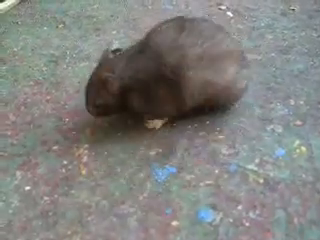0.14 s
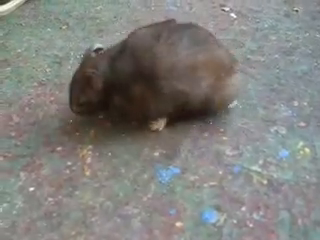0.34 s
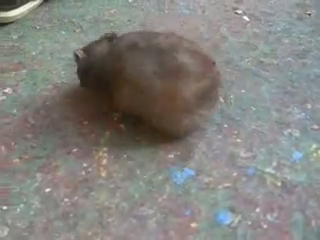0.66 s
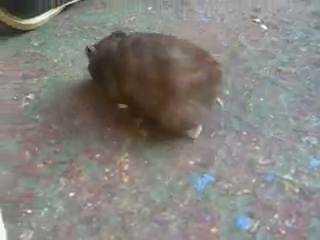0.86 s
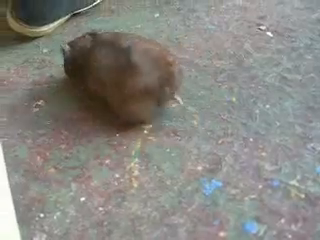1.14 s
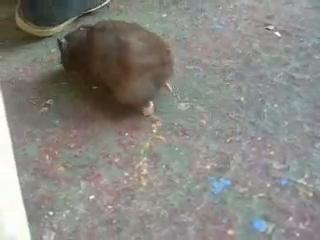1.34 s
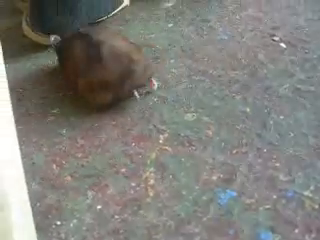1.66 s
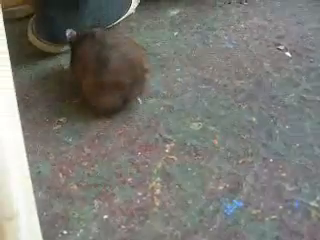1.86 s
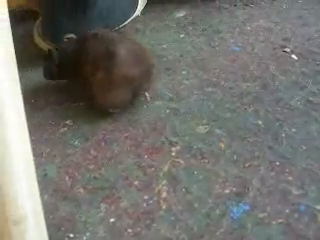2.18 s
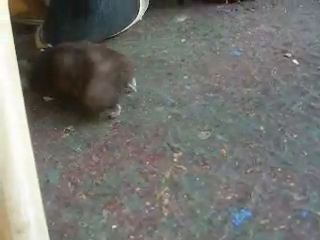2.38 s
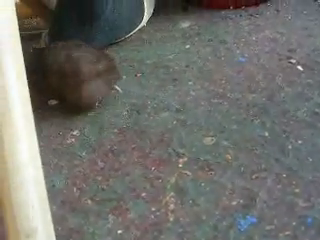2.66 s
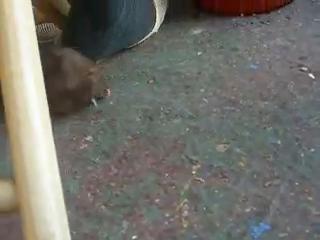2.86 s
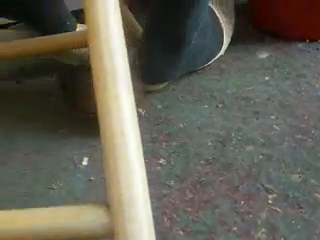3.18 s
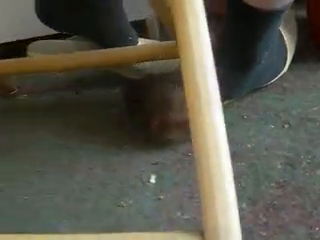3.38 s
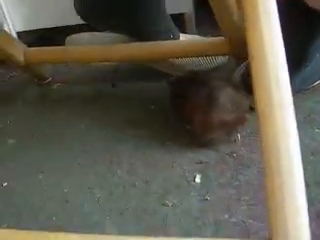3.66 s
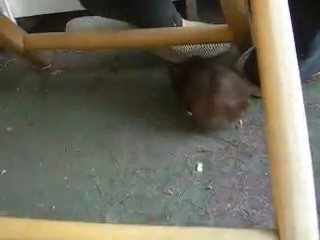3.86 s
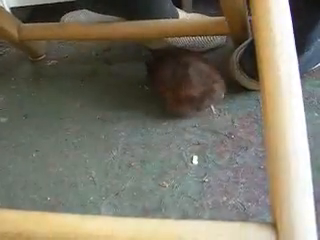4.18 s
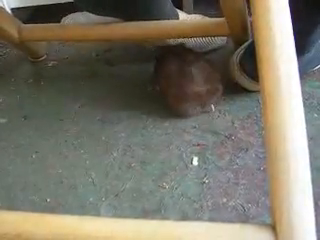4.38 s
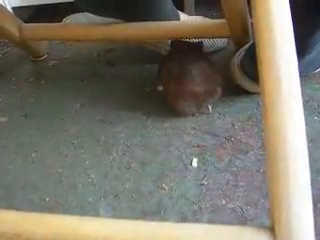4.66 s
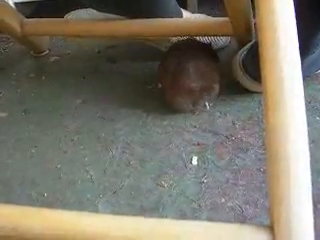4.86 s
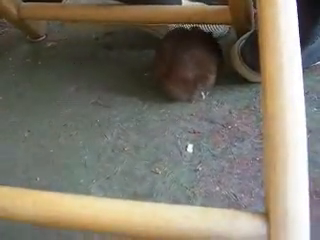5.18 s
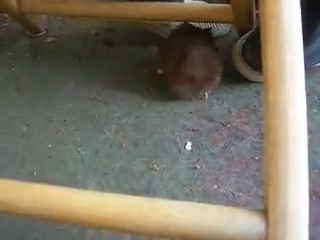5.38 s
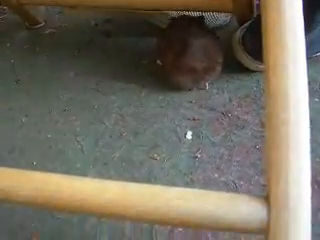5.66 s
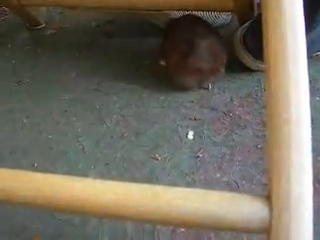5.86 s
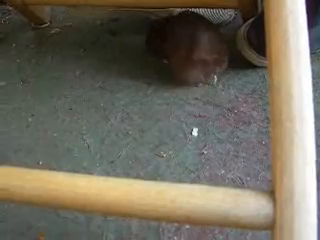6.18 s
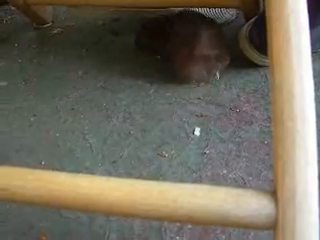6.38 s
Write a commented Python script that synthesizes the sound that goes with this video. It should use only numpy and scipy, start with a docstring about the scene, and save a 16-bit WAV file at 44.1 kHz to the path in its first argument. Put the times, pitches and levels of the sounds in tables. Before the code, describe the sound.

Over a steady low rush and wavering far motor hum, a small rodent calls in shrill, hoarse-edged chirping squeaks, at first about a second apart, then closer together and mostly weaker. Dull bumps and crisp clicks on the floor fall between them, and a faint drone appears late. The indoor space is reverberant; the small camera microphone sounds lo-fi, with harsh mirrored highs.

```python
"""From the start a low rush, shaped noise, and a far motor's hum, two wavering sines, lie under the scene.
A small rodent gives nine shrill squeaks: near-sine whistles that slide up and turn raspy, ringing in a room.
Among them come dull knocks and then sharp floor ticks, damped noise bursts; late on a faint sine drones.
Throughout, a pocket camera samples slowly and holds each sample, mirroring the squeaks into the treble."""
import sys
import numpy as np
from scipy import signal
from scipy.fft import rfft, irfft
from scipy.io import wavfile
from scipy.ndimage import map_coordinates

SR = 44100
rng = np.random.default_rng(int(sys.argv[2]) if len(sys.argv) > 2 else 0)


def wav_out(sig):
    """Save sig, one row per channel (or a flat mono array), as 16-bit PCM at SR to the path in sys.argv[1]."""
    wavfile.write(sys.argv[1], SR, np.round(np.clip(np.atleast_2d(sig).T, -1, 1) * 32767).astype(np.int16))


N = 287532
TIME = np.arange(N) / SR  # s

# Levels in the tables are relative: source, room and camera gains follow.
# Squeaks, one row a note; the sixth starts with a faint extra note and the ninth has two:
# (start [s], lead-in [s], length [s], opening pitch [Hz], top pitch [Hz], closing pitch [Hz],
#  lead-in level [dB], level [dB], fade [dB], opening roughness [0-1], late roughness [0-1])
SQUEAK_NOTES = [ (0.206, .030, 0.085, 2991, 3498, 3040, -22, -8.5, 11, .16, 0.59),
                (1.341, 0.039, 0.084, 3230, 3477, 2812, -24.5, -12, 3, 0.5, 0.61),
                (2.237, 0.039, 0.068, 3130, 3594, 3038, -20, -11.5, 4.5, 0.3, 0.53),
                (3.067, 0.029, 0.098, 3022, 3471, 2958, -24, -13.5, 2, 0.42, 0.51),
                (4.249, .036, 0.092, 3290, 3360, 2755, -24.5, -14, 4.5, 0.48, 0.48),
                (4.81, 0.019, 0.043, 3110, 3090, 3050, -41, -34, 3, .68, 1),
                (4.896, .054, 0.018, 2878, 2896, 2884, -23.5, -5.5, 4.5, 0.15, 0.22),
                (5.081, .072, .066, 2897, 3180, 3030, -20, -13.5, 10.5, 0.35, 0.31),
                (5.593, .088, 0.057, 2885, 2900, 2830, -31, -24, 8.5, 0.6, 0.49),
                (6.075, 0.049, 0.0066, 2960, 2940, 2900, -40, -21, 4.5, 0.21, 0.37),
                (6.119, 0.03, 0.091, 2700, 2554, 2676, -33, -25.5, 11, .6, 0.41)]
# A second, lower whistle around the eighth squeak: (time [s], pitch [Hz], level [dB], roughness [0-1])
LOWER_WHISTLE = [(5.605, 1684, -30, 0.36), (5.625, 1760, -37, .2), (5.635, 2190, -28.5, 0.2),
                 (5.68, 2060, -51, 0.05)]
# Brief pressure changes, nearly all pushes that make the voice louder: (time [s], boost [dB])
PRESSURE_PUSHES = [(2.237, 5), (2.255, -0.5), (4.27, 6.5), (4.850, 4), (5.044, 4), (5.536, 6)]
# Sharp ticks on the floor: (time [s], level [dB], centre [Hz])
FLOOR_TICKS = [(1.5244, -19.5, 2600), (1.7858, -36.5, 2900), (2.5284, -31.5, 3620), (2.5544, -36, 2680),
               (3.4161, -17, 2900), (3.4338, -25.5, 2730), (3.4986, -22, 2250), (3.6132, -23.5, 2860),
               (3.6706, -37.5, 1630)]
# Dull knocks, the loudest with a rebound: (time [s], level [dB], centre [Hz])
DULL_KNOCKS = [(.424, -20, 750), (2.9535, -13.5, 680), (2.976, -26, 1100)]
# Spectrum of the low rush of the surroundings: (frequency [Hz], relative density [dB])
RUSH_SPECTRUM = [(15, -52), (25, -20), (32, -27.5), (101, -7.5), (127, -10), (160, -3.5), (190, -4.5),
                 (245, -4), (266, -6), (351, -4.5), (524, -8.5), (1170, -13), (3900, -29), (5070, -13),
                 (8580, -120)]
# Course of the rush: (time [s], level [dB], level of the band near 700 Hz re the rush [dB])
RUSH_COURSE = [(0, -31.5, -3), (.6, -31.5, -4), (1.2, -32, -6), (1.9, -31.5, -12), (3.2, -30.5, -32.5),
               (4.5, -33, -16.5), (5.501, -34, -7.5), (6.52, -33.5, -10.5)]
# Partials of the motor hum: (frequency [Hz], relative level [dB])
HUM_PARTIALS = [(161.5, -40.5), (242.2, -42)]
# Course of the motor hum: (time [s], level [dB])
HUM_COURSE = [(0, -39), (.6, -34), (1.9, -31.5), (2.3, -39.5), (3.6, -32), (4.2, -35), (4.5, -43),
              (5.3, -36), (6.52, -38)]
# The faint far drone: (time [s], pitch [Hz], level [dB])
DRONE_COURSE = [(4.3, 406, -64), (4.7, 414.6, -37), (5.4, 436.3, -37), (5.9, 411, -42), (6.25, 437, -34.5),
                (6.52, 426.5, -39.5)]

LEAD_HZ, LEAD_SWELL_DB, LEAD_ROUGH = 2542, 8, 0.619  # every lead-in starts low and hoarse, and swells
LEAD_FADE_S = 0.0039  # time constant with which the voice creeps in
BREAK_AT, TOP_AT, DROP_AT = 0.29, 0.44, 0.81  # shares of the length: voice breaks, reaches top, starts to drop
ATTACK_S, RELEASE_S, RELEASE_DB = 0.0134, 0.0082, 15.5
THROB_DB, THROB_HZ = 1.72, 72.4  # uneven pressure within a squeak: rms depth and rate
PUSH_S = 0.0056  # time from the centre of a push to 1/e of its boost
LURCH_HZ, LURCH_RATE_HZ = 150, 91  # a fully rough voice also lurches in pitch: rms depth and rate
HOLD_HZ, TOP_HZ = 7884, 12500  # the camera's sample rate and upper band limit


def undb(db):
    """An amplitude ratio is ten to the power of its decibels over twenty."""
    return 10 ** (np.asarray(db) / 20)


def unit(x):
    """Division by the root mean square gives a signal of rms 1."""
    return x / np.sqrt(np.mean(x ** 2))


def shaped(gain, size=N):
    """White noise filtered in the frequency domain takes the spectrum gain(f), here at rms 1."""
    f = np.fft.rfftfreq(size, 1 / SR) + 1e-3  # keeps clear of 0 Hz
    spectrum = rfft(rng.standard_normal(size)) * gain(f)
    return unit(irfft(spectrum, size))


def wander(rate_hz):
    """Low-passed noise is a random motion up to about the given rate."""
    return shaped(lambda f: 1 / (1 + (f / rate_hz) ** 4))


def band(hz, width_hz, size=N):
    """A resonance passes noise near its centre and rejects it by detuning over bandwidth."""
    return shaped(lambda f: 1 / (1 + ((f * f - hz * hz) / (f * width_hz)) ** 2), size)


def rodent(jitter_hz=260, jitter_rate_hz=600, flutter_depth=1.72, flutter_rate_hz=330, rasp_db=-6):
    """A tiny voice goes between clean and harsh as its oscillation loses regularity; pressure sets its level."""
    jitter = jitter_hz * wander(jitter_rate_hz) + LURCH_HZ * wander(LURCH_RATE_HZ)
    flutter = flutter_depth * (wander(flutter_rate_hz) + 1j * wander(flutter_rate_hz))
    rasp = undb(rasp_db) * band(hz=2890, width_hz=5600)
    pressure_db = THROB_DB * wander(THROB_HZ)
    for s, boost_db in PRESSURE_PUSHES:
        pressure_db += boost_db * np.exp(-((TIME - s) / PUSH_S) ** 2)
    paths = [squeak(*note) for note in SQUEAK_NOTES] + [LOWER_WHISTLE]
    voice = sum(whistle(path, jitter, flutter, rasp) for path in paths)
    return undb(pressure_db) * voice


def squeak(start, lead_s, length, hz, top_hz, end_hz, lead_db, db, fade_db, rough, late_rough):
    """A note is a path of pitch, level and roughness: a hoarse upward slide, a break toward the top, a fade."""
    t = np.linspace(-lead_s, length + RELEASE_S, 200)  # 0 is the end of the lead-in
    broken, top, drop = length * np.array([BREAK_AT, TOP_AT, DROP_AT])
    pitch = np.interp(t, [-lead_s, 0, broken, top, drop, length],
                      [LEAD_HZ, hz, hz, top_hz, top_hz, end_hz])
    faded_db = db - fade_db
    level = np.interp(t, [-lead_s, -ATTACK_S, 0, length, length + RELEASE_S],
                      [lead_db - LEAD_SWELL_DB, lead_db, db, faded_db, faded_db - RELEASE_DB])
    level -= RELEASE_DB * np.exp(-(t + lead_s) / LEAD_FADE_S)
    roughness = np.interp(t, [-ATTACK_S, 0, broken, top], [LEAD_ROUGH, rough, rough, late_rough])
    return np.column_stack([start + t, pitch, level, roughness])


def whistle(path, jitter, flutter, rasp):
    """Random modulation of a near-sine's phase and amplitude smears its line into a band; noise adds rasp."""
    s, *columns = np.transpose(path)
    on = (TIME >= s.min()) & (TIME <= s.max())
    hz, db, rough = (np.interp(TIME[on], s, column) for column in columns)
    cycle = np.exp(2j * np.pi * np.cumsum(hz + rough * jitter[on]) / SR)
    strength = np.sqrt(2 * (1 - rough ** 2)) + rough * flutter[on]
    out = np.zeros(N)
    out[on] = undb(db) * (np.real(cycle * strength) + rough * rasp[on])
    return out


def taps(rows, width_hz, t60, gain_db, rise_s):
    """A contact excites one broad, heavily damped resonance, which decays exponentially."""
    out = np.zeros(N)
    t = TIME[:SR // 10]
    decay = np.exp(-np.log(1000) * t / t60)  # 60 dB down after t60 seconds
    envelope = (1 - np.exp(-t / rise_s)) * decay
    for s, db, hz in rows:
        i = int(s * SR)
        out[i:i + len(t)] += undb(db + gain_db) * band(hz, width_hz, size=len(t)) * envelope
    return out


def room(x, t60, wet_db, direct_db, early=1.0, early_s=0.066):
    """Reverberation is convolution with echoes that grow denser and decay, strongest early, after the direct sound."""
    t = TIME[:SR * 3 // 4]
    density = np.clip(0.03 + (t / 0.097) ** 2, 0, 1)  # chance of an echo in each sample
    present = rng.standard_normal(len(t)) * (rng.random(len(t)) < density)
    echoes = present / np.sqrt(density)
    echoes *= np.exp(-np.log(1000) * t / t60)
    echoes *= 1 + early * np.exp(-t / early_s)  # reflections from floor and furniture
    echoes *= t > 0.002
    echoes /= np.sqrt(np.sum(echoes ** 2))
    reverberant = signal.fftconvolve(x, echoes)[:N]
    return undb(direct_db) * x + undb(wet_db) * reverberant


def motor_hum(gain_db=-3, waver_db=3.5, drift=0.00767):
    """Two partials of one far motor share its drifting speed, while the level of each wavers on its own."""
    turns = np.cumsum(1 + drift * wander(rate_hz=4.2)) / SR
    hum = np.zeros(N)
    for hz, db in HUM_PARTIALS:
        hum += undb(db + waver_db * wander(rate_hz=1.6)) * np.sin(2 * np.pi * hz * turns)
    level_db = np.interp(TIME, *np.transpose(HUM_COURSE))
    return unit(hum) * undb(gain_db + level_db)


def far_drone(drift=0.02975, waver_db=2.8):
    """A sine whose phase integrates an unsteady pitch is heard as a faint drone."""
    s, path_hz, path_db = np.transpose(DRONE_COURSE)
    hz = np.interp(TIME, s, path_hz) * (1 + drift * wander(rate_hz=19.4))
    db = np.interp(TIME, s, path_db, left=-np.inf)  # silent before its first row
    return np.sin(2 * np.pi * np.cumsum(hz) / SR) * undb(db + waver_db * wander(rate_hz=16))


def low_rush(gain_db=0.84):
    """Broadband noise has the surroundings' spectrum, with a resonant band whose share of it varies."""
    hz, db = np.transpose(RUSH_SPECTRUM)
    s, *columns = np.transpose(RUSH_COURSE)
    level_db, swell_db = (np.interp(TIME, s, column) for column in columns)
    rush = shaped(lambda f: undb(np.interp(np.log(f), np.log(hz), db)))
    swell = undb(swell_db) * band(hz=690, width_hz=580)
    return (rush + swell) * undb(gain_db + level_db)


def scene():
    """Sound pressures superpose: voice and contacts, each with its reverberation, add to the background."""
    voice = room(rodent(), t60=0.45, wet_db=-1.5, direct_db=-1.5)
    ticks = taps(FLOOR_TICKS, width_hz=3700, t60=0.06, gain_db=2.5, rise_s=0.00013)
    knocks = taps(DULL_KNOCKS, width_hz=730, t60=0.042, gain_db=-2.5, rise_s=0.0019)
    contacts = room(ticks + knocks, t60=0.98, wet_db=-7.5, direct_db=2)
    background = motor_hum() + far_drone() + low_rush()
    return (voice + contacts + background)[None]


def record(dry, ceiling=0.71, offset=-0.021):
    """Overload clips peaks in the camera; holding each slow sample as a step makes spectral images in the treble."""
    x = np.clip(dry + offset, -ceiling, ceiling)  # the input sits slightly off zero
    below_half_rate = signal.butter(28, 3780, fs=SR, output="sos")
    x = signal.sosfilt(below_half_rate, x)
    held = np.floor(TIME * HOLD_HZ) / HOLD_HZ  # time of the latest slow sample
    steps = map_coordinates(x[0], [held * SR], order=3, mode="nearest")
    top_limit = signal.ellip(10, 0.2, 60, TOP_HZ, fs=SR, output="sos")
    return signal.sosfilt(top_limit, steps)[None]


dry = scene()
out = record(dry)
wav_out(out)
```